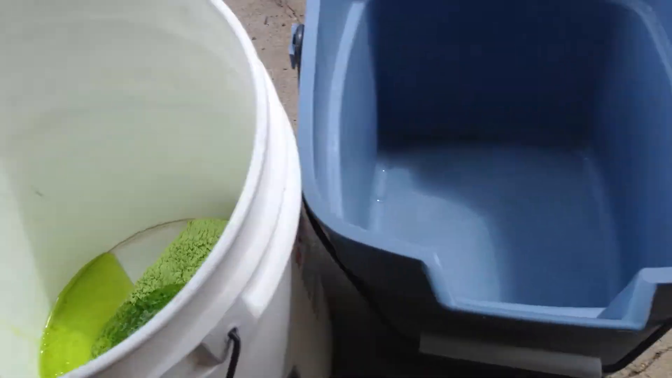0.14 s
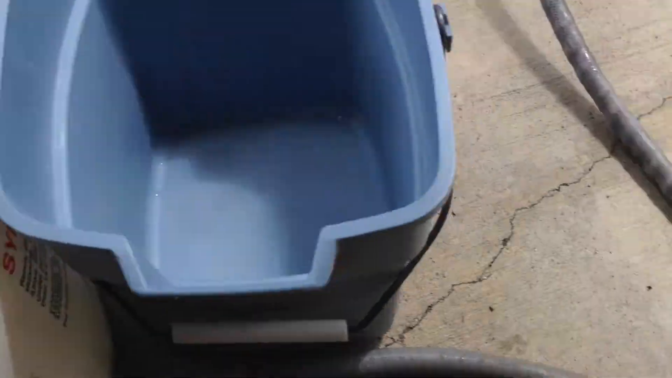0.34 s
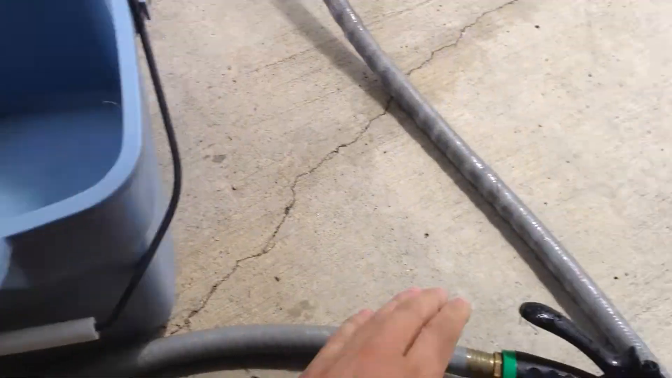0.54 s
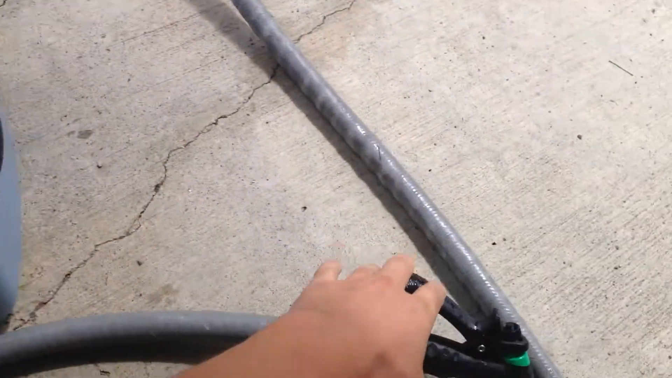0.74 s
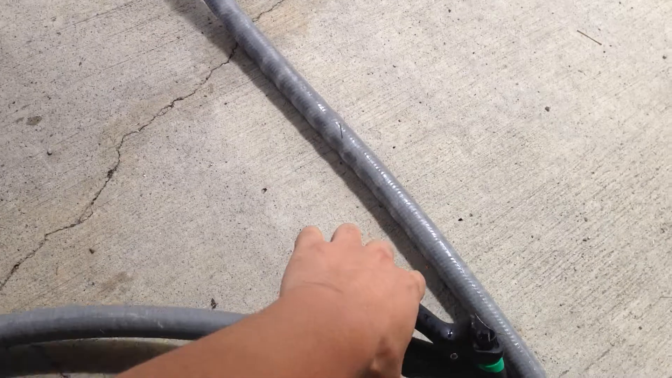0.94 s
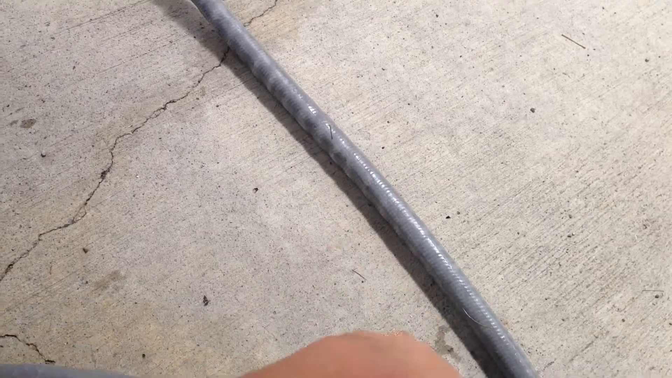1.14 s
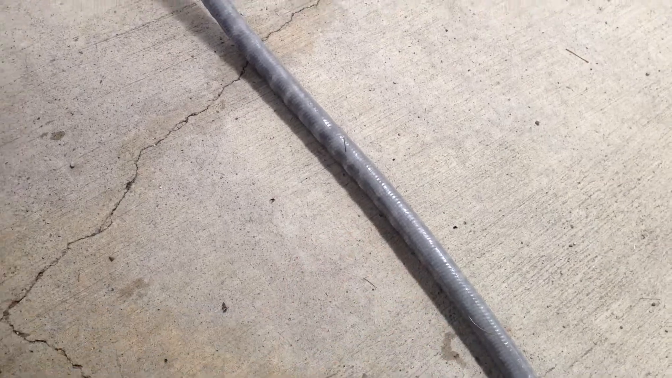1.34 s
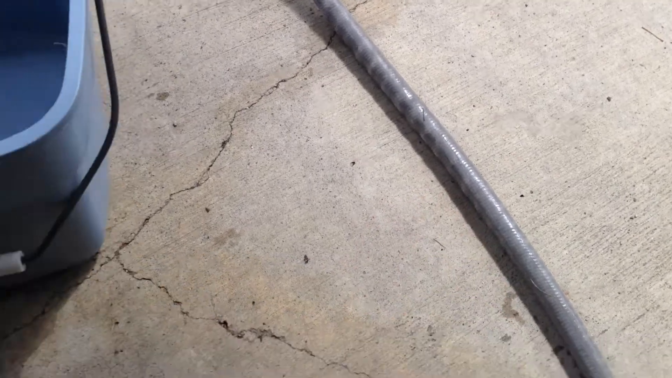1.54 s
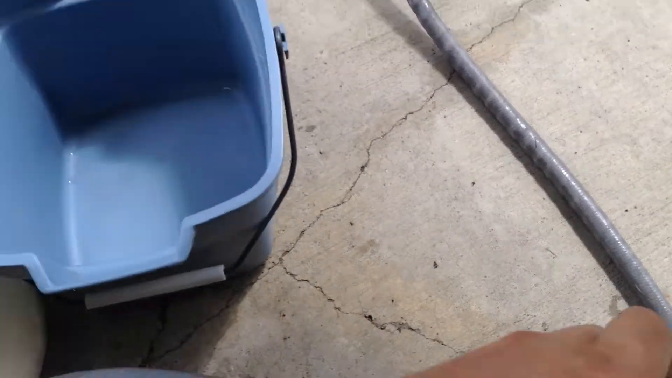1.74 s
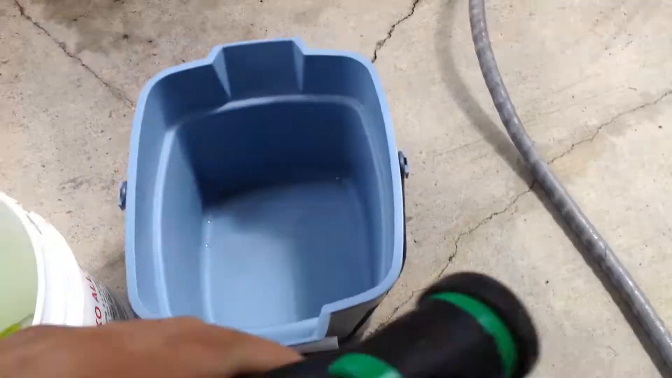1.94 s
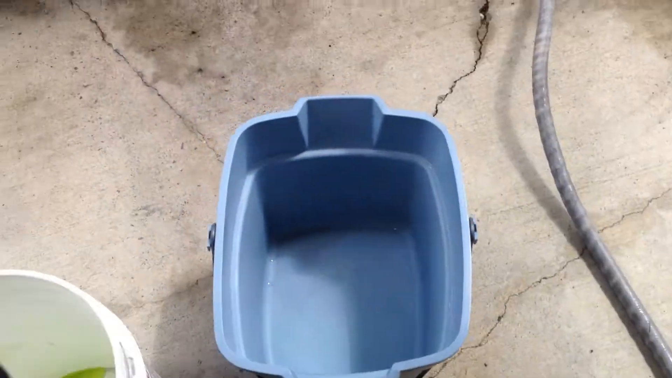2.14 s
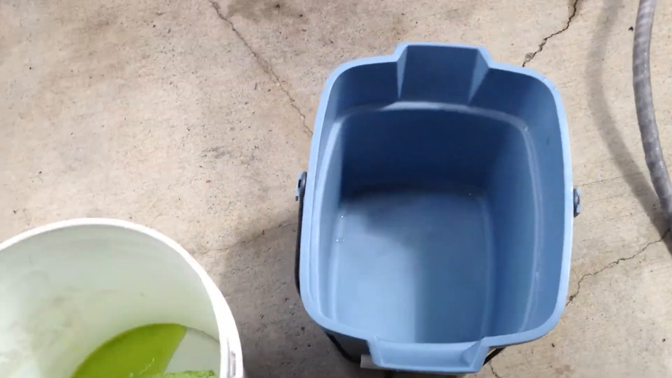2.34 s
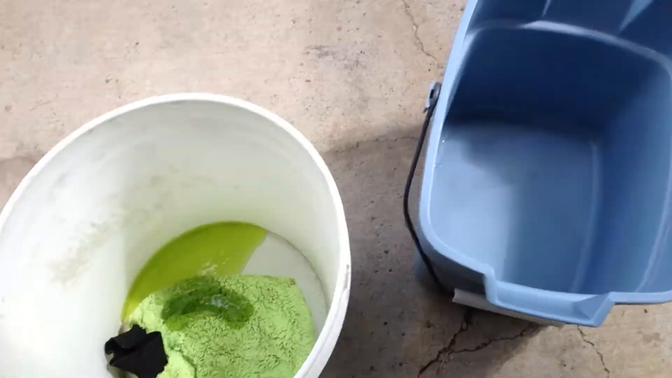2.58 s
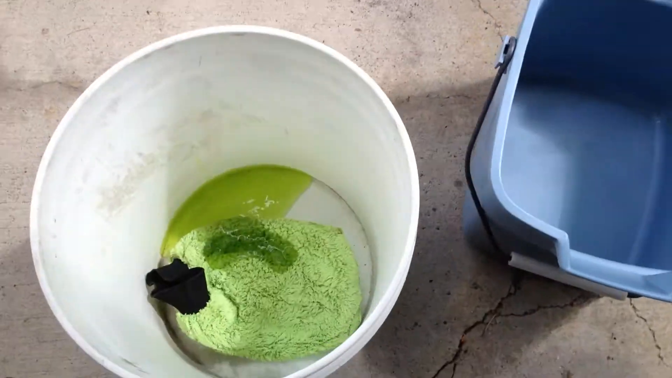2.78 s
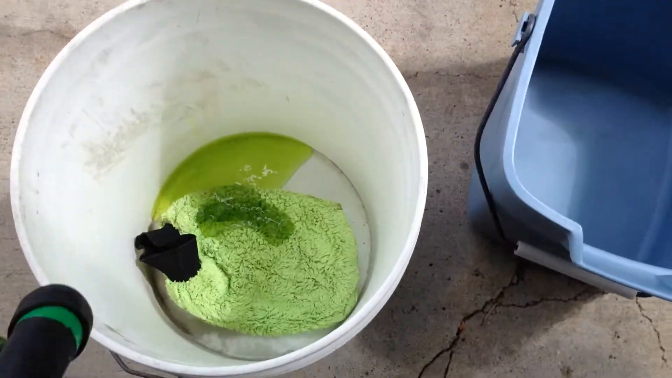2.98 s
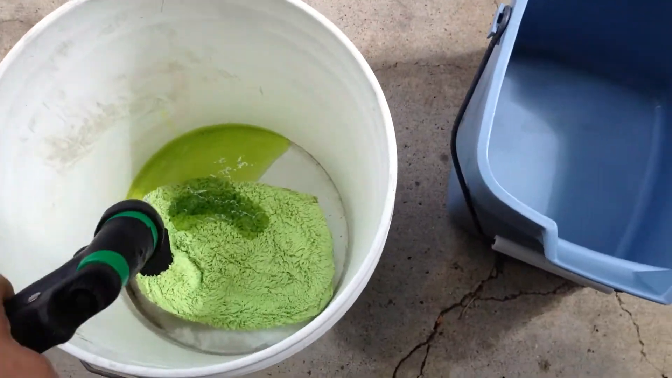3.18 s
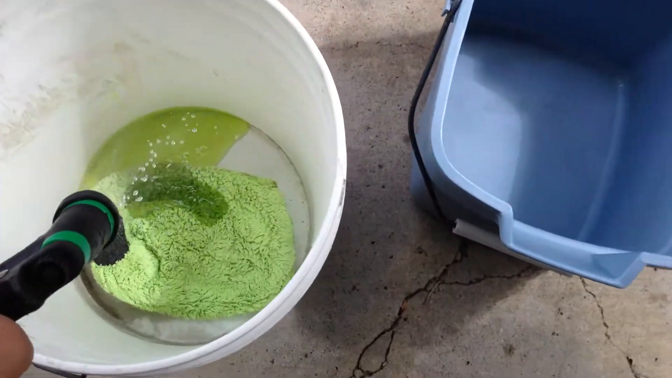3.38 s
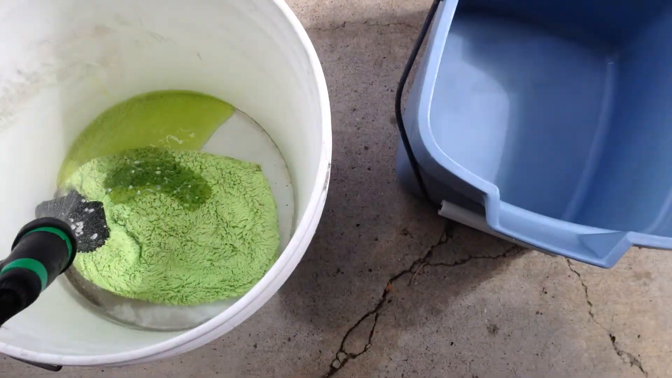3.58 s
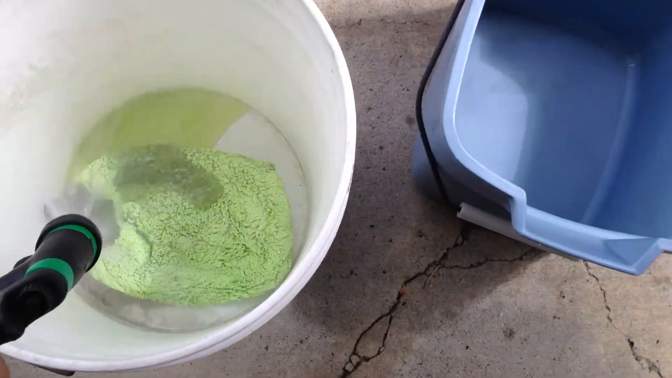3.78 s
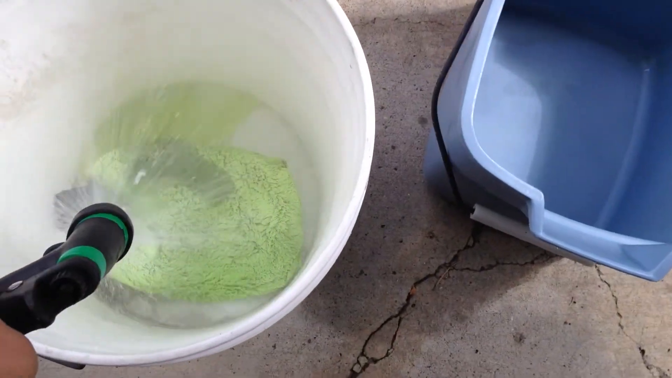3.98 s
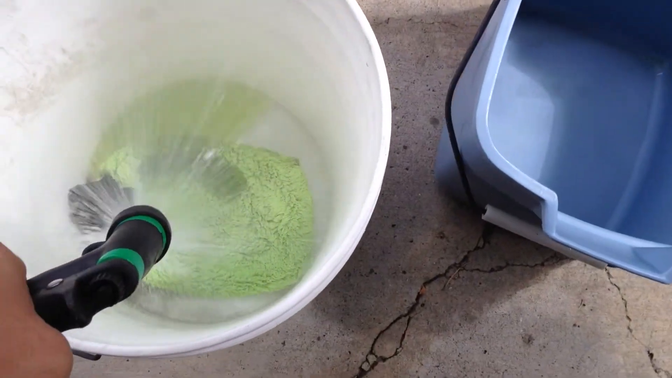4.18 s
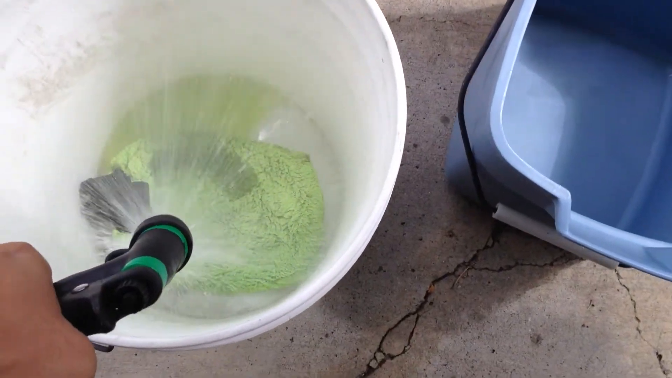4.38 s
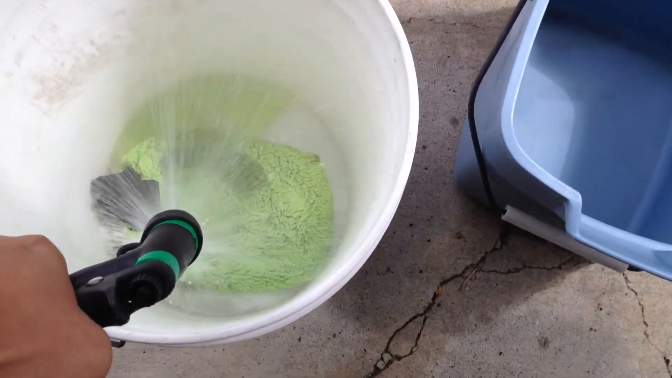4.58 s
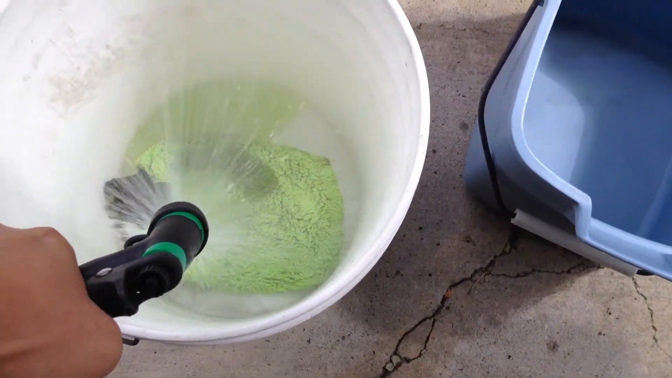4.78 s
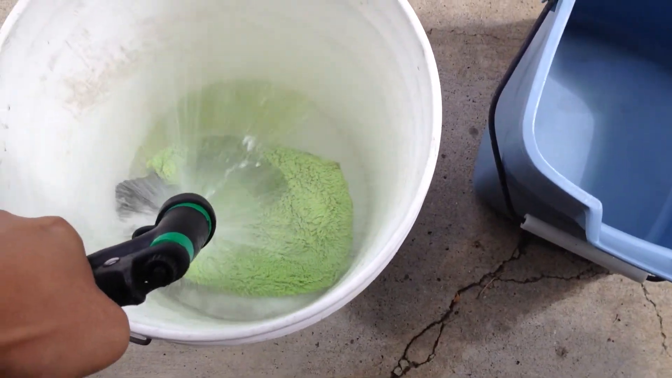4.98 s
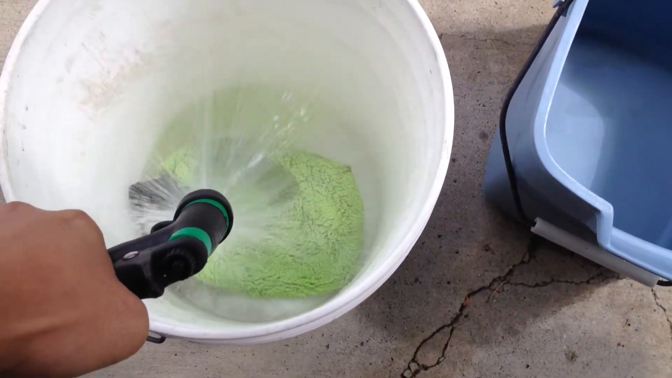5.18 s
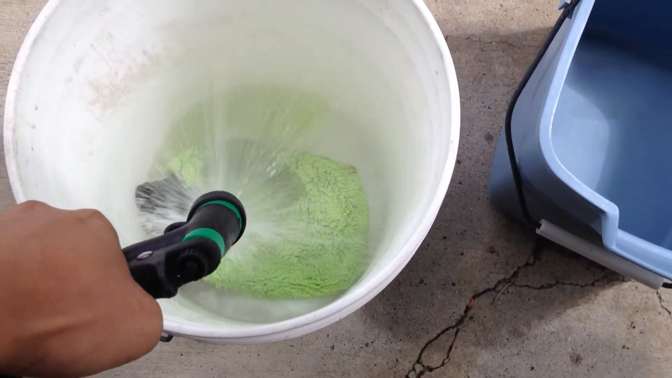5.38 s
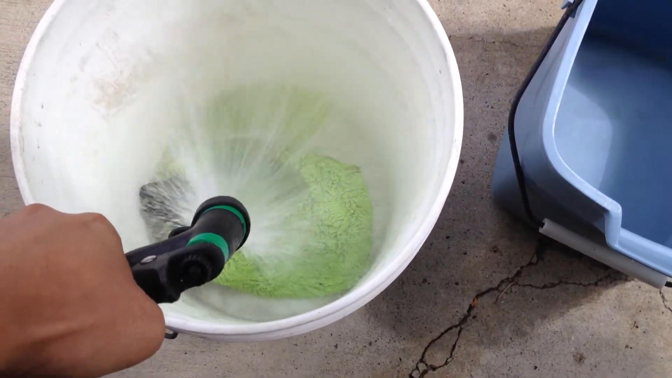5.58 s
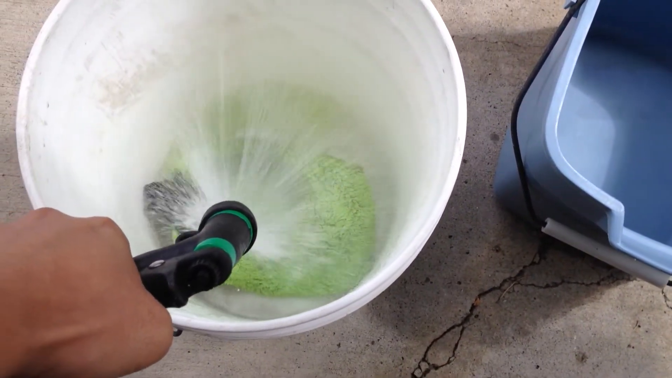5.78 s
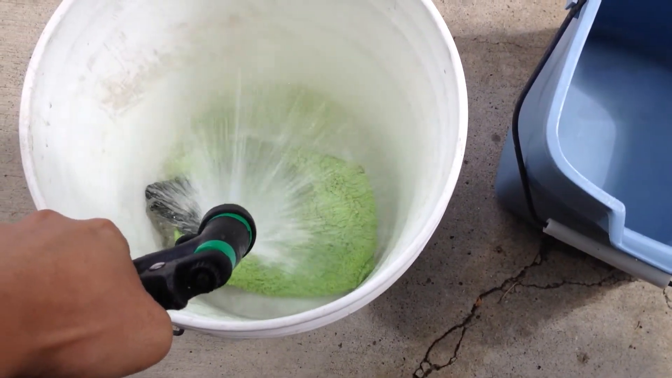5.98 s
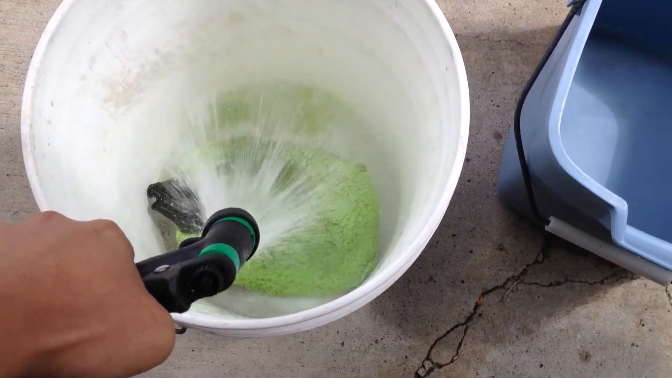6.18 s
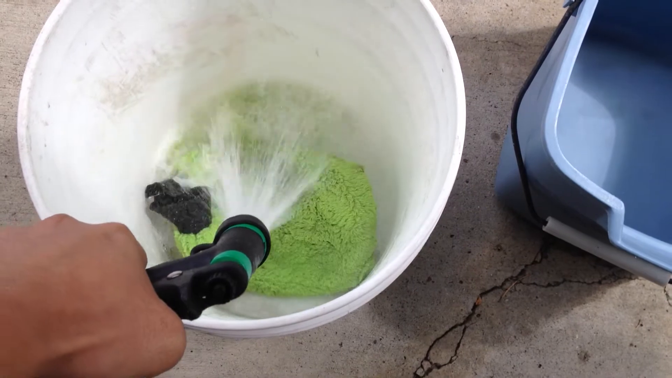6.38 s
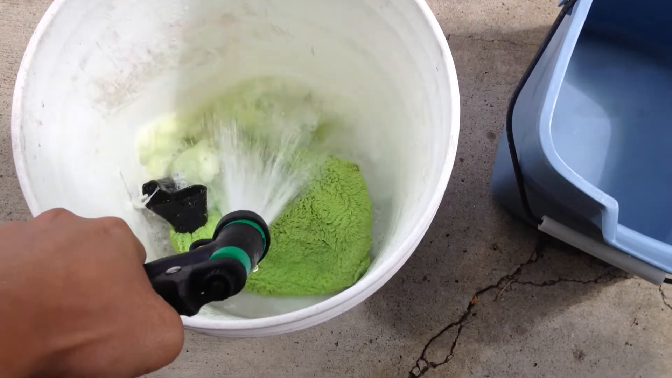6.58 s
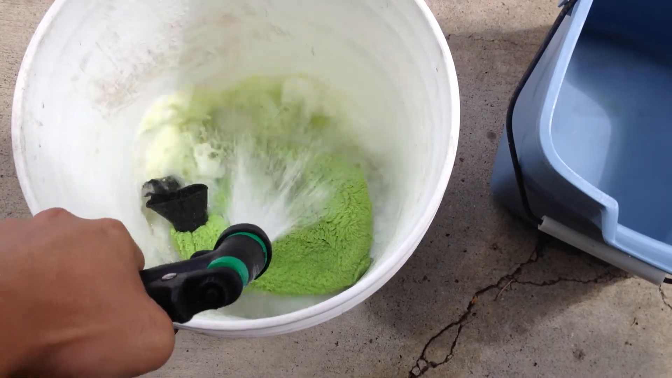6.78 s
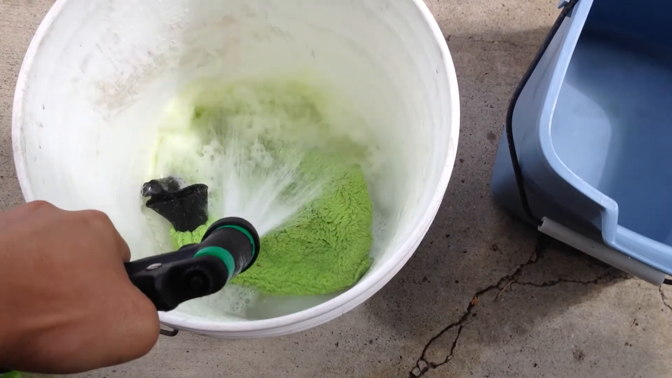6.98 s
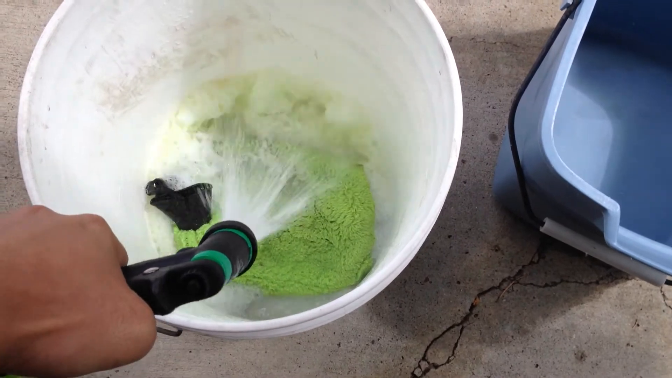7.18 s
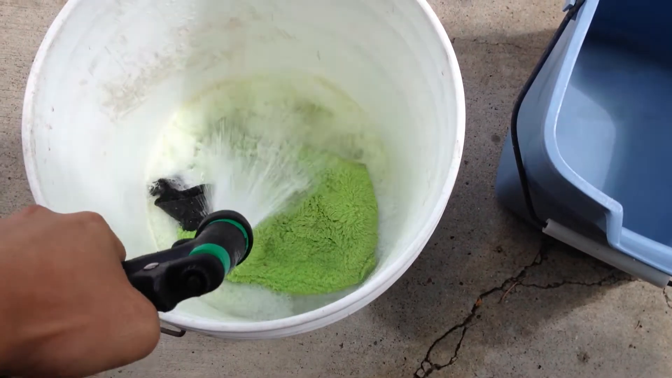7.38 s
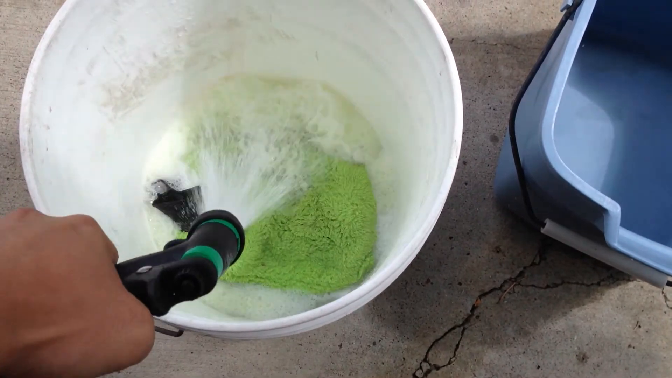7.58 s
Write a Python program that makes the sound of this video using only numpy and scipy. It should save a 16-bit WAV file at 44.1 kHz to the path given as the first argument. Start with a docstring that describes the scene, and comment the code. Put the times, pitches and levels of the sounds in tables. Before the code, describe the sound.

After light taps and a clatter of plastic buckets, fine hose spray drums inside a nearly empty bucket, turning harder, bubbly and splashing.

```python
"""In a quiet concrete yard, a hose nozzle is picked up and two plastic buckets are knocked and dragged.
Blows are noise bursts over ringing walls and bottom; drags are streams of tiny catches.
The nozzle opens with a faint hiss, then a fine spray of scattered impacts drums in a nearly empty bucket.
Late on it narrows to a harder jet: surging resonances, bubbles and splats in the pooling water."""
import sys
import numpy as np
from scipy import signal
from scipy.fft import rfft, irfft, next_fast_len
from scipy.io import wavfile
from scipy.ndimage import map_coordinates

SR = 44100
rng = np.random.default_rng(int(sys.argv[2]) if len(sys.argv) > 2 else 0)


def transcribe(u):
    """Save the signal u as a 16-bit wav file named by the first command-line argument.

    u: samples, shape (n,) or (channels, n), limited to [-1, 1]; the rate is SR.
    q: integer samples, one column per channel.
    """
    v = np.clip(np.atleast_2d(u).T, -1, 1)
    q = np.round(v * 32767).astype(np.int16)
    wavfile.write(sys.argv[1], SR, q)


N = 336483
TIME = np.arange(N) / SR
RING = np.arange(SR // 2) / SR  # the time axis of one struck sound, s


def amp(db):
    """Decibels to gain."""
    return 10 ** (np.asarray(db) / 20)


def unit(x):
    """Scale to rms 1."""
    return x / np.sqrt(np.mean(x ** 2) + 1e-20)


def curves(rows):
    """One value per sample for each column after the time."""
    s, *columns = np.transpose(rows)
    return [np.interp(TIME, s, column) for column in columns]


def during(start, end, fade=.01):
    """A gate that fades in up to its start and fades out after its end."""
    fade_in = np.clip((TIME - start) / fade + 1, 0, 1)
    fade_out = np.clip((end - TIME) / fade + 1, 0, 1)
    return fade_in * fade_out


def ramp(start, length):
    """A smooth rise from 0 to 1."""
    return np.sin(np.pi / 2 * np.clip((TIME - start) / length, 0, 1)) ** 2


def wobble(rate):
    """A smooth random curve, rate knots a second."""
    return map_coordinates(rng.standard_normal(int(N * rate / SR) + 4), [TIME * rate])


def filtered(x, response):
    """x times a response of frequency."""
    size = next_fast_len(len(x) + 8192)
    return irfft(rfft(x, size) * response(np.fft.rfftfreq(size, 1 / SR)), size)[:len(x)]


def coloured(x, spectrum):
    """x with a (Hz, dB) spectrum, at rms 1; it falls away below the first point."""
    f, db = np.transpose(spectrum)

    def response(hz):
        curve_db = np.interp(np.log(hz + 1), np.log(f + 1), db)
        return amp(curve_db) * np.minimum(hz / (f[0] + 1), 1) ** 2
    return unit(filtered(x, response))


def resonated(x, body):
    """x through steep-sided (Hz, width Hz, dB) resonances whose powers add, at rms 1."""
    def response(f):
        powers = [amp(2 * db) / (1 + ((f * f - hz * hz) / (f * width + 1)) ** 2) ** 2
                  for hz, width, db in body]
        return np.sqrt(sum(powers))
    return unit(filtered(x, response))


def noise(spectrum, size=N):
    """Coloured noise of rms 1."""
    return coloured(rng.standard_normal(size), spectrum)


def impacts(rate, spread_db, size=N):
    """Tiny impacts of scattered size at random moments, rate a second, at rms 1."""
    scatter_db = spread_db * np.clip(rng.standard_normal(size), -2, 2)
    sizes = amp(scatter_db) * rng.choice([-1, 1], size)
    return unit(sizes * (rng.random(size) < rate / SR))


def fall(t60, attack=.001):
    """The envelope of a struck thing."""
    return amp(-60 * RING / t60) * (1 - np.exp(-RING / attack))


def ringing(modes):
    """Damped modes, at slightly new strengths for each blow."""
    return sum(amp(db + 2 * rng.standard_normal()) * fall(t60) * np.sin(2 * np.pi * hz * RING)
               for hz, db, t60 in modes)


def burst(spectrum, envelope):
    """A short noisy contact whose energy is set by its envelope alone."""
    return unit(noise(spectrum, len(RING)) * envelope) * np.sqrt(np.mean(envelope ** 2))


def strokes(rows, attack, t60):
    """The envelope of (s, length s, dB) strokes: each swells up to its start, holds and dies away."""
    return sum(ramp(s - attack, attack) * amp(db - 60 * np.maximum(TIME - s - length, 0) / t60)
               for s, length, db in rows)


def add(track, s, sound):
    """Lay a sound into a track at a time."""
    part = track[max(round(s * SR), 0):][:len(sound)]
    part += sound[:len(part)]


# The quiet of the yard. Each row: frequency in Hz, relative level in dB per Hz.
YARD_SPECTRUM = [(15, -35.5), (25, -19), (54, -2.5), (91, -9.5), (318, -13.5), (649, -21), (781, -20.5),
                 (868, -20.5), (1190, -23), (2140, -21.5), (2940, -24.5), (3180, -23.5), (7820, -25.5),
                 (14000, -27.5)]


def yard():
    """Steady noise, low-weighted, stands for the air of the yard."""
    return amp(-64.5) * noise(YARD_SPECTRUM)


# The hollow boom of a jolted bucket. Each row: frequency in Hz, relative level in dB per Hz.
JOLT_SPECTRUM = [(24, -59), (40, -18), (161, 4.5), (269, -12), (310, -5), (363, 2.5), (379, 2), (419, -17),
                 (541, -19), (581, -15.5), (642, -14), (877, -24), (1200, -28), (1560, -55), (2640, -120)]


def jolt():
    """A jolted bucket shudders hollowly, then dies away."""
    start_s, length_s, level_db = 0.003, 0.077, -30
    return strokes([(start_s, length_s, level_db)], attack=0.017, t60=0.25) * noise(JOLT_SPECTRUM)


# Things are shifted about. Each row: start in seconds, length in seconds, level in dB.
SHIFTS = [(0.0, 0.22, -50.5), (0.38, 0.13, -60.5), (0.6, 0.036, -63), (0.88, 0.59, -66.5),
          (0.99, 0.05, -73), (2.65, 0.17, -42), (3.37, 0.038, -58.5), (3.56, .05, -67)]
# Their low rumble. Each row: frequency in Hz, relative level in dB per Hz.
RUMBLE_SPECTRUM = [(15, -45.5), (25, -45), (102, 4.5), (160, 3.5), (220, -6.5), (377, -3.5), (517, -29),
                   (557, -27), (591, -27.5), (900, -30.5), (1170, -61), (1980, -120)]


def shifting():
    """Shifted things rumble low, in slightly uneven lumps."""
    lumps = amp(0.5 * wobble(40))
    return strokes(SHIFTS, attack=0.017, t60=0.18) * lumps * noise(RUMBLE_SPECTRUM)


# Dull bumps of handling. Each row: start in seconds, relative level in dB, pitch in Hz.
BUMPS = [(0.003, -23, 299), (0.018, -38, 156), (0.068, -37, 159), (0.126, -32, 164), (0.248, -32, 65),
         (0.339, -41, 62), (0.395, -36, 95), (0.431, -26, 98), (0.497, -36, 52), (0.633, -37.5, 109),
         (0.907, -43, 81), (2.649, -21.5, 161), (2.779, -41, 104.7), (3.379, -34, 105), (3.429, -43, 57)]


def bumps():
    """Each dull bump is one quickly damped low tone."""
    out = np.zeros(N)
    for s, db, hz in BUMPS:
        add(out, s, amp(db - 4.0) * fall(0.074, attack=0.0014) * np.sin(2 * np.pi * hz * RING))
    return out


# Plastic and hose slide on concrete. Each row: start in seconds, length in seconds, level in dB.
SCUFFS = [(0.0, 0.098, -52.5), (0.635, 0.048, -63.5), (0.74, 0.094, -69), (0.845, 0.12, -61),
          (0.985, 0.034, -64), (1.16, .28, -72), (1.99, 0.1, -58.5), (2.4, .09, -49), (2.525, .1, -39.5),
          (2.66, .12, -55.5)]
# Short gritty drags. Each row: start in seconds, length in seconds, level in dB.
SCRAPES = [(1.861, .01, -46), (2.094, 0.063, -42), (2.21, .01, -38.5), (2.892, 0.018, -43)]
# The tone of the scuffs. Each row: frequency in Hz, relative level in dB per Hz.
SLIDE_SPECTRUM = [(240, -45), (400, -13), (534, 0), (701, -16), (935, -18.5), (1250, -10.5), (1540, -5),
                  (1880, -3.5), (2060, -1), (2830, -17), (6710, -35.5), (7930, -28.5), (15000, -47.5)]
# The tone of the scrapes. Each row: frequency in Hz, relative level in dB per Hz.
GRIT_SPECTRUM = [(290, -47.5), (500, -17), (758, -21), (941, -19.5), (1060, -15), (1170, -15.5), (1880, -2),
                 (2430, -9), (2930, -24), (3240, -20.5), (5130, -18), (6180, -26.5), (15500, -38)]


def sliding():
    """Plastic catches on the grains of the concrete; each drag rings out briefly."""
    scuff = strokes(SCUFFS, attack=0.017, t60=0.17)
    scrape = strokes(SCRAPES, attack=0.0099, t60=0.15)
    catching = amp(3 * wobble(80))
    scratch = coloured(impacts(600, spread_db=4), SLIDE_SPECTRUM)
    grit = coloured(impacts(2500, spread_db=4), GRIT_SPECTRUM)
    return catching * (scuff * scratch + scrape * grit)


# The nozzle and hose tap as they are handled.
# Each row: start in seconds, relative level in dB, tick in dB relative to the tap before a 3 dB trim.
TAPS = [(0.06, -21, -29), (0.339, -55.5, 7), (0.829, -41.5, -11), (0.984, -29.5, -31),
        (1.003, -21.5, -36.5), (1.012, -24.5, -29), (1.029, -27.5, -33.5), (1.089, -38.5, -24),
        (1.104, -31, -35), (1.126, -45, -22), (1.207, -44.5, 0), (1.284, -54.5, 6), (1.335, -50, 2.5),
        (1.364, -45, -7.5), (1.429, -48, -18.5), (2.768, -34, -12)]
# The dead body of a tap. Each row: frequency in Hz, relative level in dB per Hz.
TAP_SPECTRUM = [(110, -44), (180, -26), (301, 3), (376, -3), (470, -26), (587, 0), (638, -23), (797, -7),
                (1180, -14), (1600, -5), (2490, -19), (3200, -13.5), (5000, -69), (6500, -81),
                (11000, -120)]
# Its bright tick. Each row: frequency in Hz, relative level in dB per Hz.
TICK_SPECTRUM = [(2500, -16), (3800, 1), (5500, 3.5), (8000, -2), (12000, -7), (15500, -12)]


def taps():
    """Small dead taps of the nozzle and hose, each with a bright tick."""
    out = np.zeros(N)
    for s, db, tick_db in TAPS:
        body = burst(TAP_SPECTRUM, fall(0.019, attack=0.00078) + amp(-15.0) * fall(0.17))
        tick = noise(TICK_SPECTRUM, len(RING)) * fall(0.023, attack=.0005)
        add(out, s, amp(db) * (amp(-9) * body + amp(tick_db - 3.0) * tick))
    return out


def falloff(hz, centre_hz):
    """A blow excites less the further a pitch lies from its centre: -6 dB at one octave, in dB."""
    return -6 * np.log2(hz / centre_hz) ** 2


def rattling(depth_db):
    """Loose parts keep chattering after a blow, so its tail dies in uneven fits."""
    fits = map_coordinates(rng.standard_normal(64), [RING * 110])
    return unit(amp(depth_db * np.clip(fits, -1.7, 1.7)))


def contact(count, span):
    """A blow lands as a main contact and a few weaker ones just after it, span s apart on average."""
    blow = np.zeros(SR // 40)
    blow[0] = 1
    at = np.minimum(rng.exponential(span, count) * SR + 1, len(blow) - 1).astype(int)
    blow[at] += .35 * rng.standard_normal(count)
    return blow


# The hard plastic clack, before it is centred. Each row: frequency in Hz, relative level in dB per Hz.
CLACK_SPECTRUM = [(180, -34), (300, 1), (376, -8), (592, -1.5), (795, -6), (921, -6), (1040, -6), (1210, 1),
                  (1370, -8), (1680, 1.5), (2960, -17.5), (3470, -29), (4500, -22.5), (5850, -59.5),
                  (9900, -120)]


def clack(centre_hz, chatter):
    """A noisy plastic contact, centred on its own pitch, with a chattering tail."""
    spectrum = [(hz, db + falloff(hz, centre_hz)) for hz, db in CLACK_SPECTRUM]
    return burst(spectrum, fall(0.032, attack=0.0003) + amp(-22) * chatter * fall(0.31))


# The bright crack of a blow. Each row: frequency in Hz, relative level in dB per Hz.
CRACK_SPECTRUM = [(1760, -33.5), (3000, -1), (3470, -3.5), (4660, -13.5), (5090, -10), (7330, -14.5),
                  (9070, -14.5), (14700, -32.5), (15500, -29.5)]


def crack(chatter):
    """A sharp burst of noise with a grainy, chattering tail."""
    grains = impacts(2500, spread_db=3, size=len(RING))
    snap = noise(CRACK_SPECTRUM, len(RING)) * fall(0.028, attack=.0004)
    return snap + amp(-11.0) * coloured(grains, CRACK_SPECTRUM) * chatter * fall(.16)


# Modes of the bucket walls. Each row: nominal frequency in Hz, relative level in dB, t60 in seconds.
WALL_MODES = [(557, -11.5, 0.11), (685, -22.5, 0.032), (935, -6.5, 0.18), (1152, -20.5, 0.35),
              (1150, -15.5, .11), (1290, -19.5, .1), (1574, -7, .11), (1640, -9.5, 0.033), (1690, -3, 0.14),
              (1970, -9.5, 0.1), (2200, -6, .12), (2310, -17, 0.28), (2510, -9.5, .09), (3500, -21.5, .12)]
# Modes of the bucket bottom. Each row: nominal frequency in Hz, relative level in dB, t60 in seconds.
BOTTOM_MODES = [(230.4, 0, 0.2), (179, -8, 0.15)]


def bucket(centre_hz):
    """Walls and bottom flex under the blow, so the modes of both shift each time."""
    bend = 1 + .025 * rng.standard_normal(len(WALL_MODES))
    walls = ringing([(hz * b, db + falloff(hz, centre_hz) / 2, t60)
                     for (hz, db, t60), b in zip(WALL_MODES, bend)])
    walls = signal.fftconvolve(walls, contact(count=4, span=0.0062))[:len(RING)]
    boom = ringing([(hz * np.sqrt(b), db, t60) for (hz, db, t60), b in zip(BOTTOM_MODES, bend)])
    return walls, boom * (1 - np.exp(-RING / 0.0049))


# The buckets bump each other and the concrete. Each row: start in seconds, relative level of the blow
# in dB, boom in dB relative to the blow before a 3 dB trim, crack in dB relative to the blow,
# centre of the clack in Hz, share of the ground thud from 0 to 1.
KNOCKS = [(1.868, -8, -21.5, -19, 2250, 0), (1.872, -4, -34, -18, 1910, 0),
          (1.878, -1, -21.5, -28.5, 1550, 0), (1.885, -9.5, -21.5, -20, 1620, 0.02),
          (1.911, -15, -19, -18, 970, 0), (1.948, -22, -15, -17, 960, 0.06),
          (1.974, -29.5, -13.5, -24, 1630, 0), (2.09, -30.5, -33, -21.5, 1700, 0.06),
          (2.123, -27, -29, -20, 1500, 0.02), (2.14, -27.5, -26.5, -24, 1970, 0.05),
          (2.185, -26, -20, -26, 1560, 0.9), (2.219, -11, -19.5, -11.5, 1150, 0.98),
          (2.241, -2, -6, -35.5, 620, 0.5), (2.248, -11, -9.5, -23, 1740, 0.9),
          (2.274, -8, -18.5, -32.5, 920, .8), (2.331, -1.5, -16, -27, 1230, .9),
          (2.346, -2, -15.5, -23.5, 660, .9), (2.354, -4.5, -13, -20.5, 1740, .8),
          (2.362, -9.5, -3.5, -20, 1540, 1), (2.408, -16.5, -1, -36.5, 550, 1),
          (2.466, -27.5, -23, -24.5, 1540, .3), (2.539, -2, -37, -29.5, 1770, 0.02),
          (2.546, -13.5, -10.5, -19, 2090, 0), (2.556, -17, -12, -24, 1600, 0),
          (2.609, -14.5, -25, -24.5, 1620, 0.3), (2.641, -22, -18, -43.5, 1700, .7)]
# The blow on the ground. Each row: frequency in Hz, relative level in dB per Hz.
THUD_SPECTRUM = [(25, -24), (60, -10), (105, 6), (140, -5), (190, -0.5), (330, -10), (600, -48)]


def knocks():
    """Each blow clacks, rings the thin walls and booms the bottom; blows on the ground also thud."""
    wall_ring_db, ground_thud_db = -17.5, -20.5
    ring_grows = 0.84  # dB of wall ring per dB of blow: soft blows ring more than they clack
    out = np.zeros(N)
    for s, db, boom_db, crack_db, centre_hz, grounded in KNOCKS:
        chatter = rattling(depth_db=4)
        walls, boom = bucket(centre_hz)
        thud = grounded * noise(THUD_SPECTRUM, len(RING)) * fall(.09, attack=0.0014)
        blow = amp(-7.5) * clack(centre_hz, chatter)
        blow += amp(wall_ring_db + (ring_grows - 1) * db) * walls
        blow += amp(crack_db) * crack(chatter)
        blow += amp(boom_db - 3.0) * boom
        blow += amp(ground_thud_db) * thud
        add(out, s, amp(db) * blow)
    return out


LEAK_S, OPEN_S, POOL_S, NARROW_S = 3.38, 3.735, 5.35, 6.29  # the stages of the flow
OPENING_S = 0.16  # from OPEN_S the squeezed trigger takes this long to open
FLIGHT_S = 0.03  # the water reaches the bucket after the nozzle starts to hiss

# The hiss of the wide spray. Each row: frequency in Hz, relative level in dB per Hz.
SPRAY_HISS = [(2500, -5), (3700, -10), (4400, -2), (5400, 3.5), (7300, 0.5), (8500, 3), (9800, 3.5),
              (11000, 1.5), (13000, 2.5), (15500, 0.5)]
# Air and wall resonances under the wide spray. Each row: frequency in Hz, width in Hz, relative level in dB.
SPRAY_BODY = [(716, 430, -16), (1022, 240, -15), (1204, 76, -8.5), (1527, 400, -5), (1746, 95, 0),
              (1858, 330, -1.5), (2372, 650, -8.5), (2920, 1300, -15.5), (3580, 1500, -20)]


def leak():
    """The barely open valve hisses thinly and spits a few drops until it opens fully."""
    rise_s, level_db = .14, -62
    lowest_hz = SPRAY_HISS[0][0]
    thin_hiss = [(hz, db + 2.5 * np.log2(hz / lowest_hz)) for hz, db in SPRAY_HISS]
    mist = noise(thin_hiss) + amp(-7.5) * resonated(impacts(900, spread_db=0), SPRAY_BODY)
    drops = coloured(impacts(40, spread_db=2.5), SPRAY_HISS)
    seep = ramp(LEAK_S - rise_s, rise_s) * (1 - ramp(OPEN_S, OPENING_S))
    return seep * amp(1.2 * wobble(12) + level_db) * (mist + amp(-8.0) * drops)


def spray(drum_gain, hiss_gain):
    """Countless fine drops blur into a hiss and a hollow drumming in the bucket."""
    body = resonated(impacts(9000, spread_db=2.5), SPRAY_BODY) * amp(0.75 * wobble(45))
    hiss = coloured(impacts(20000, spread_db=4), SPRAY_HISS) * amp(0.64 * wobble(30))
    # for a moment the fan grazes the wall and the hiss gains a sharper band
    sharp_band = [(4500, -27.5), (6000, -5), (7000, -3), (8000, -7.5), (9300, -4.5), (11000, -20.5)]
    grazing = noise(sharp_band) * during(4.5, 4.75, fade=0.22)
    return drum_gain * amp(0.68) * body + hiss_gain * (amp(-0.33) * hiss + amp(-4.0) * grazing)


# The bucket bottom drummed by water. Each row: frequency in Hz, relative level in dB per Hz.
DRUM_SPECTRUM = [(40, -56), (95, -22.5), (150, -13), (220, 3), (260, -1.5), (330, -4.5), (450, -14),
                 (700, -40)]


def bottom_boom(drum_gain):
    """The bottom booms only once the spray hits hard, and more as water gathers on it."""
    pressure = ramp(OPEN_S + 2 * FLIGHT_S, OPENING_S)
    boom_db = -19.5 + 2.5 * ramp(POOL_S, 0.37)  # relative to the drumming
    return pressure * drum_gain * amp(boom_db) * noise(DRUM_SPECTRUM)


def gurgle(body, depth_db):
    """The churning surface feeds each resonance in surges of its own, at rms 1."""
    out = np.zeros(N)
    for hz, width, db in body:
        surge = amp(depth_db * wobble(45))
        band = resonated(impacts(3000, spread_db=5), [(hz, width, 0)])
        out += amp(db) * np.sqrt(width) * surge * band
    return unit(out)


def bubbles(count, centre_hz, spread, cycles):
    """Short bubble tones that rise in pitch as they near the surface, at rms 1."""
    s, octave, size = rng.random(count), rng.standard_normal(count), rng.exponential(size=count)
    hz = np.clip(centre_hz * 2 ** (spread * octave), 300, 9000)[:, None]
    t = RING[:1200]
    age = hz * t / cycles
    envelope = amp(4.3 * np.minimum(size, 4))[:, None] * np.exp(-age) * (1 - np.exp(-8 * age))
    tones = envelope * np.sin(2 * np.pi * hz * t * (1 + 0.029 * np.minimum(age, 4)))
    where = (s * N).astype(int)[:, None] + np.arange(len(t))
    return unit(np.bincount(where.ravel(), tones.ravel(), minlength=N)[:N])


# The jet drags air under and the pool gulps. Each row: centre in seconds, level in dB.
GULPS = [(6.62, -31), (6.79, -28.5), (6.96, -27.5)]
# Air and wall resonances under the jet. Each row: frequency in Hz, width in Hz, relative level in dB.
JET_BODY = [(554, 290, -14), (763, 325, -8.5), (1116, 430, -11), (1420, 244, -5), (1726, 270, -8),
            (1990, 274, 0), (2453, 360, -2.5), (3180, 840, -10), (3380, 2000, -19)]
# The hiss of the jet. Each row: frequency in Hz, relative level in dB per Hz.
JET_HISS = [(2500, -20.5), (3700, 1), (4400, 0), (5300, 3.5), (6200, 2.5), (7400, 1), (8600, 4.5),
            (11500, 3), (13500, 4), (15500, 1)]
# The jet digs into the pool. Each row: frequency in Hz, relative level in dB per Hz.
PLUNGE_SPECTRUM = [(2500, -17), (3100, 10.5), (3800, -10), (4500, 0.5), (5400, 1.5), (6300, 4.5),
                   (7500, -11), (11000, -21.5)]


def jet():
    """The jet churns the pool in surges: coarser drops, bubbles and foam that slowly cushions it."""
    age = np.maximum(TIME - NARROW_S, 0)
    foam_db = -3 * age  # growing foam takes off 3 dB a second
    surge = wobble(60)
    body = unit(gurgle(JET_BODY, depth_db=1.3) * amp(1.2 * surge))
    drops = coloured(impacts(14000, spread_db=3.0), JET_HISS)
    hiss = unit(drops * amp(.5 * surge + .6 * wobble(160)))
    swells = sum(amp(db) * np.exp(-((TIME - s) / 0.034) ** 2) for s, db in GULPS)
    gulps = swells * resonated(impacts(3000, spread_db=3.5), JET_BODY[:3])
    froth = bubbles(count=3000, centre_hz=751, spread=0.49, cycles=4)
    # as it first digs into the pool it tears the water with a brighter rasp
    rasp = coloured(impacts(3000, spread_db=7.5), PLUNGE_SPECTRUM)
    plunge = rasp * amp(2.2 * surge) * during(6.55, 6.71, fade=0.17)
    drumming = amp(-24 + foam_db) * (amp(3.0) * body + amp(-13) * froth)
    return drumming + amp(-18.5 + foam_db) * (hiss + amp(-4.5) * plunge) + gulps


# The jet slaps the pool. Each row: start in seconds, level in dB before a 12.5 dB cut.
SPLATS = [(6.5325, -5.5), (6.6202, -2.5), (6.6498, -3), (6.6774, 1), (6.7665, -7.5), (7.0333, -6.5)]


def splats():
    """Each slap is a burst through the jet's resonances with a shorter, brighter splash."""
    out = np.zeros(N)
    for s, db in SPLATS:
        slap = resonated(rng.standard_normal(len(RING)), JET_BODY) * fall(0.055)
        splash = noise(PLUNGE_SPECTRUM, len(RING)) * fall(0.035)
        add(out, s, amp(db - 12.5) * (slap + amp(-8.5) * splash))
    return out


def walled(x, delay, echo_db):
    """The bucket wall sends back a weak copy that ripples the spectrum."""
    return filtered(x, lambda hz: 1 + amp(echo_db) * np.exp(-2j * np.pi * hz * delay))


# The wide spray wanders over the bucket.
# Each row: time in seconds, relative drumming level in dB, relative hiss level in dB.
SPRAY_LEVEL = [(4.0, -27, -27.5), (4.04, -26, -27), (4.78, -29, -30), (4.99, -29.5, -31), (5.37, -29, -29),
               (5.94, -25.5, -31.5), (6.25, -25.5, -29.5)]


def hose():
    """The valve opens and the spray narrows to a jet, over the booming bottom and splats."""
    drum_db, hiss_db = curves(SPRAY_LEVEL)
    drum_gain = amp(drum_db) * ramp(OPEN_S + FLIGHT_S, OPENING_S)
    hiss_gain = amp(hiss_db) * ramp(OPEN_S, OPENING_S)
    focus = ramp(NARROW_S, 0.31)  # 0 is a wide spray, 1 a jet
    water = np.sqrt(1 - focus) * spray(drum_gain, hiss_gain) + np.sqrt(focus) * jet()
    water += bottom_boom(drum_gain) + splats()
    return walled(water, delay=.00145, echo_db=-26.0)


def scene():
    """Everything reaches one microphone, over the quiet of the yard; both channels are alike."""
    handled = jolt() + shifting() + bumps() + sliding() + taps() + knocks()
    handled *= during(.004, 8, fade=.004)  # a soft start
    mono = yard() + handled + leak() + hose()
    return np.array([mono, mono])


def record(dry):
    """The microphone dips in the upper mids; the recorder rounds off peaks and ends at its band limit."""
    dip_hz, dip_width_hz, dip_db, top_hz = 2790, 150, -3.5, 15330
    port = lambda hz: amp(dip_db * np.exp(-((hz - dip_hz) / dip_width_hz) ** 2))
    heard = np.array([filtered(channel, port) for channel in dry])
    rounded = heard / (1 + (heard / .7) ** 6) ** (1 / 6)
    return np.array([filtered(channel, lambda hz: hz < top_hz) for channel in rounded])


dry = scene()
out = record(dry)
transcribe(out)
```